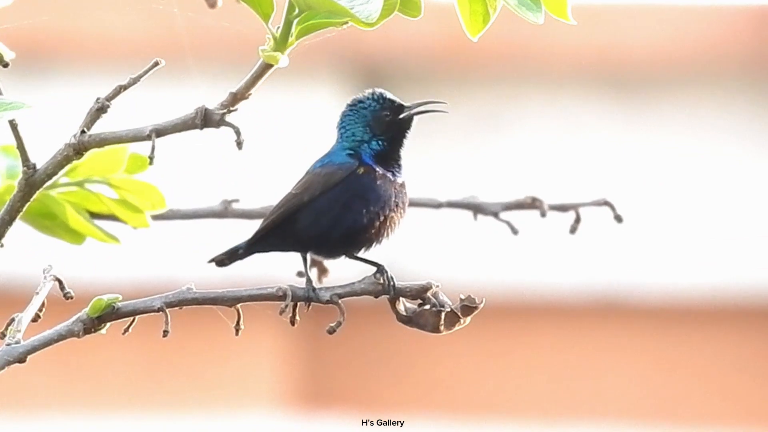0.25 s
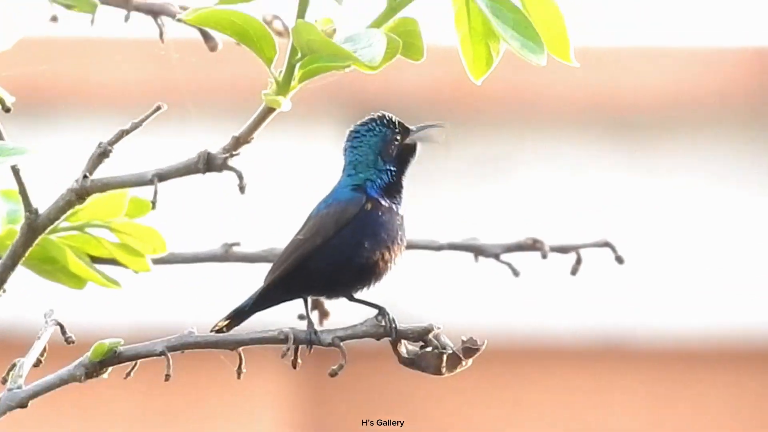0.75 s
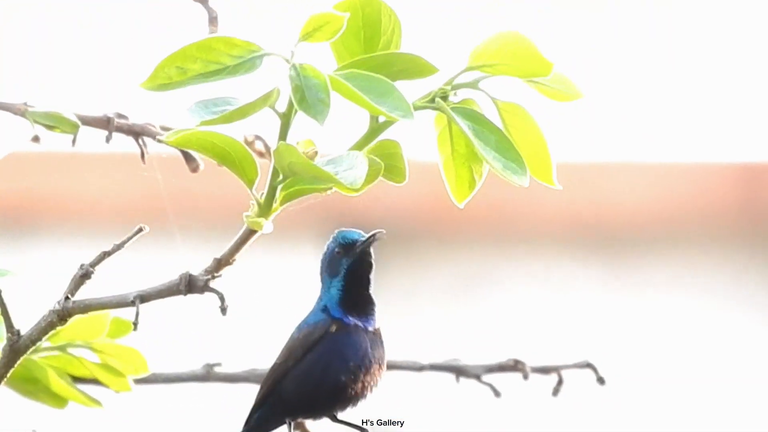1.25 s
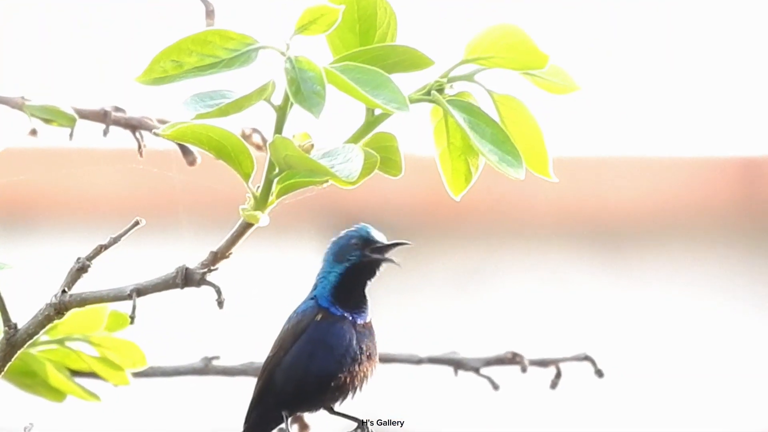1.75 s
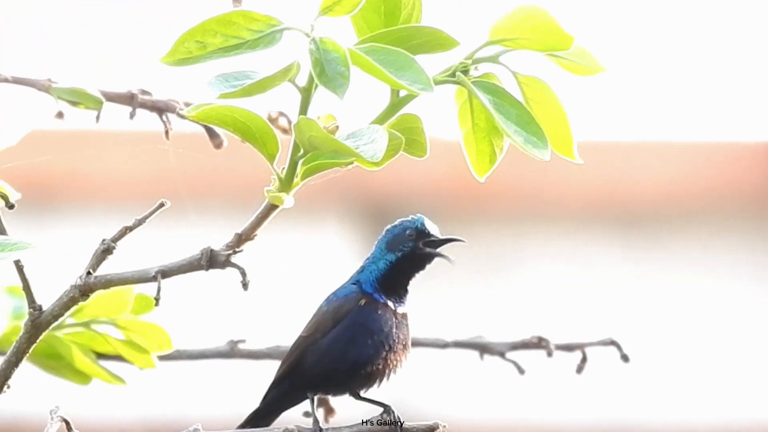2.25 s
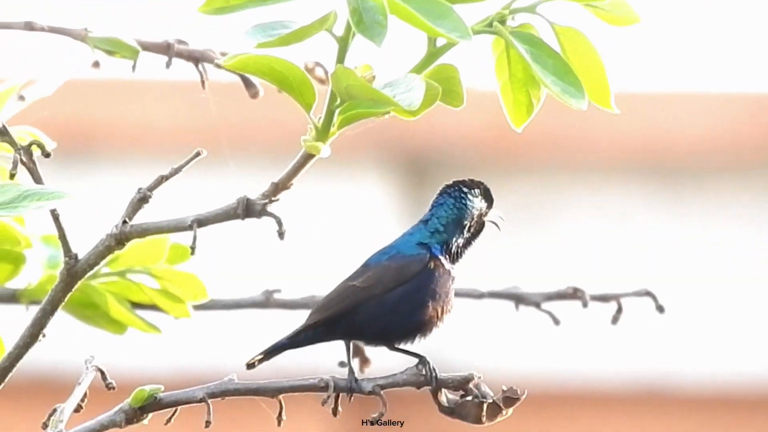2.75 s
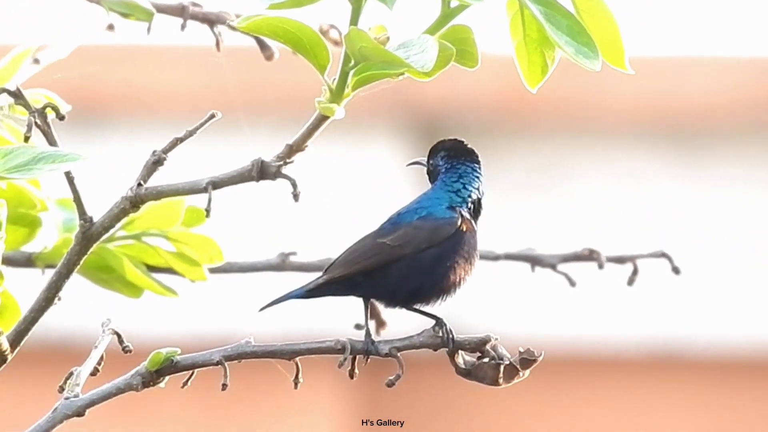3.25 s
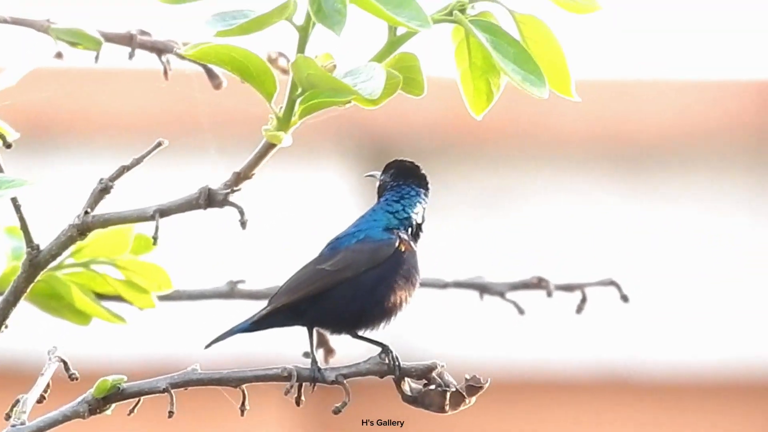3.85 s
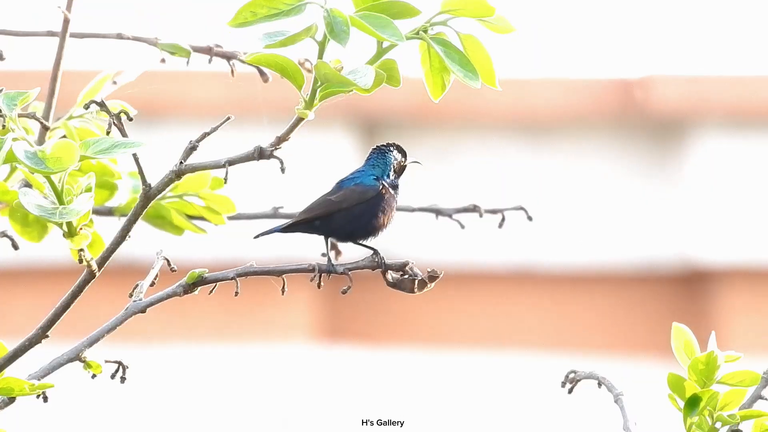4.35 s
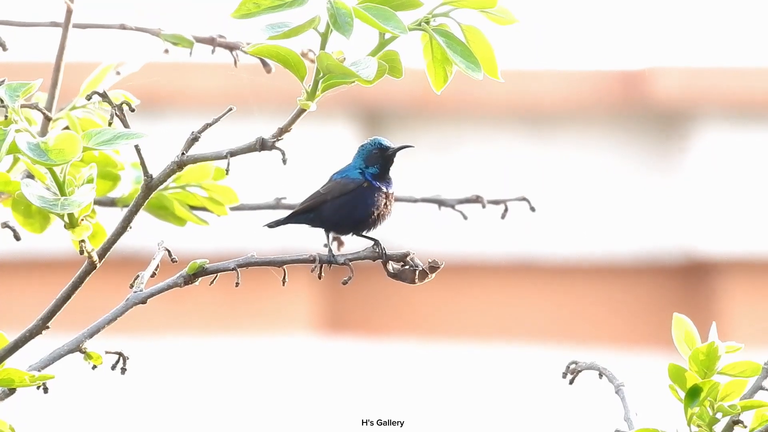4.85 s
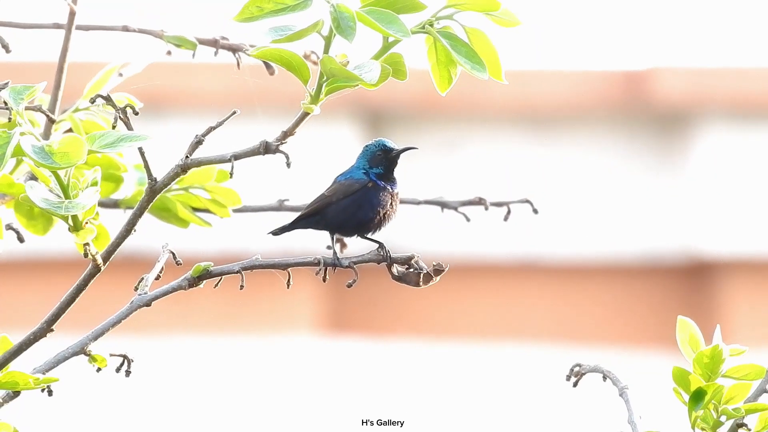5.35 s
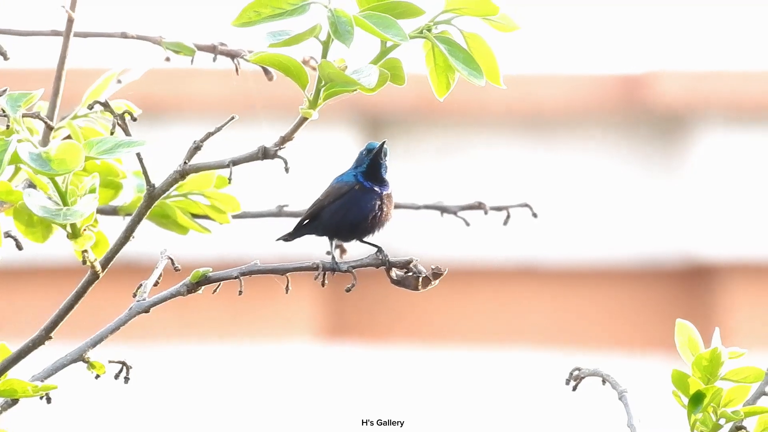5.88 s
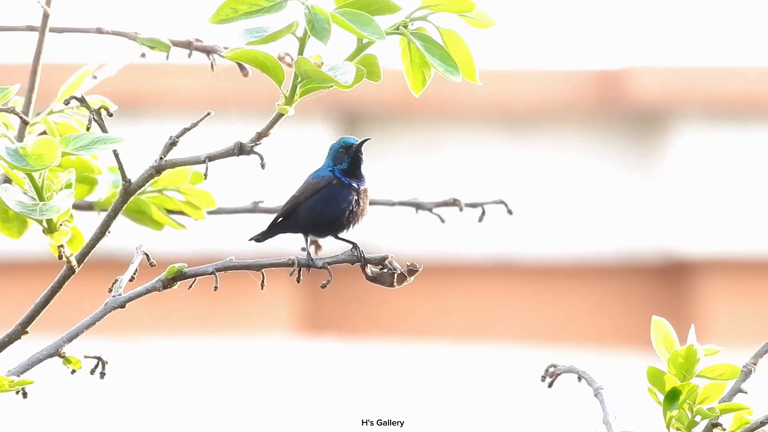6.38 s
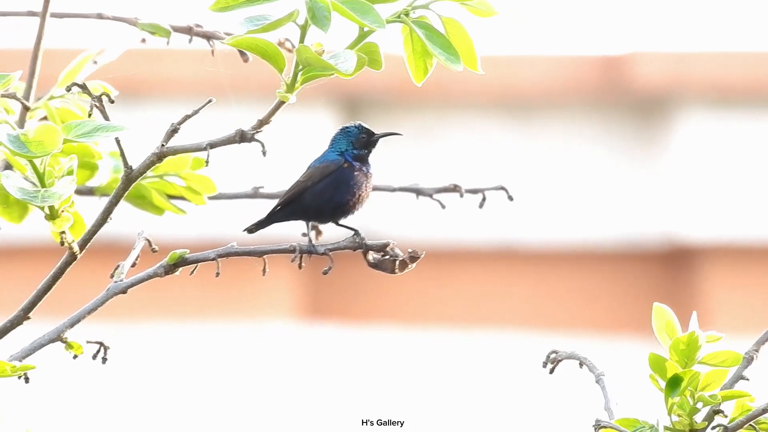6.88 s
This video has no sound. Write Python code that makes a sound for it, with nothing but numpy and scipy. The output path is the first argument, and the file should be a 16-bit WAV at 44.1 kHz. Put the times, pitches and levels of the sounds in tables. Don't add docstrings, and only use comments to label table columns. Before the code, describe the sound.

Bright, fast sunbird song outdoors, sharp upward whistles and thin chips, a quieter middle with a far trill, then singing again over soft town hush.

```python
import sys
import numpy as np
from scipy import signal
from scipy.fft import rfft, irfft, next_fast_len
from scipy.io import wavfile
from scipy.ndimage import uniform_filter1d, minimum_filter1d, map_coordinates

SR = 44100
rng = np.random.default_rng(int(sys.argv[2]) if len(sys.argv) > 2 else 0)


def gain_from_decibels(decibels):
    exponent = np.asarray(decibels, float) / 20
    return 10 ** exponent


def log_audio(samples):
    frames = np.atleast_2d(samples).T
    limited = np.clip(frames, -1, 1)
    pcm = np.round(limited * 32767).astype(np.int16)
    wavfile.write(sys.argv[1], SR, pcm)


N = 313992


def unit(x):
    return x / np.sqrt(np.mean(x ** 2) + 1e-20)


def along(points, hz):
    f, v = np.transpose(points)
    return np.interp(np.log(hz + 1), np.log(f + 1), v)


def filtered(x, response):
    m = next_fast_len(N + 8192)
    return irfft(rfft(x, m) * response(np.fft.rfftfreq(m, 1 / SR)), m)[..., :N]


def smoothed_power(x):
    return np.abs(uniform_filter1d(np.mean(x ** 2, axis=0), size=1024))


def wobble(n, rate_hz):
    knots = rng.standard_normal(int(n * rate_hz / SR) + 4)
    return map_coordinates(knots, [np.arange(n) * rate_hz / SR])


def rush(spectrum, patchy_db):
    # (f/Hz, correlation)
    alike_points = [(60, .93), (1000, .93), (2500, .85), (5000, .7), (9000, .3)]
    z = signal.stft(rng.standard_normal((2, N + 512)), nperseg=512)[2]
    field = uniform_filter1d(rng.standard_normal(z.shape[1:]), size=3, axis=0)
    field = uniform_filter1d(field, size=14, axis=1)
    pair = signal.istft(z * gain_from_decibels(patchy_db * unit(field)), nperseg=512)[1][:, :N]

    def mid_side(hz):
        angle = np.arccos(np.clip(along(alike_points, hz), -1, 1)) / 2
        return gain_from_decibels(along(spectrum, hz)) * [np.cos(angle), np.sin(angle)]

    mid, side = filtered(pair, mid_side)
    return unit(np.array([mid + side, mid - side]))


def town():
    # (f/Hz, density/dB per Hz)
    rumble_points = [(15, -67), (25, -36.5), (45, -6.5), (65, 1.5), (146, 3), (237, -9.5), (302, -10),
                     (450, -23.5), (580, -39.5), (990, -120)]
    # (f/Hz, density/dB per Hz)
    hiss_points = [(200, -42), (330, -14.5), (540, -14), (670, -9.5), (870, -13.5), (1860, -14.5),
                   (2900, -11.5), (3700, -10), (6700, -10), (8400, -29), (10000, -35), (12500, -39),
                   (15300, -49.5), (15900, -71)]
    rumble = gain_from_decibels(-2.5) * rush(rumble_points, patchy_db=-0.45)
    hiss = gain_from_decibels(2.5) * rush(hiss_points, patchy_db=3.0)
    return gain_from_decibels(-43) * (rumble + hiss)


def whistle(rows, flutter_hz, flutter_db, breath_db, edge_s):
    s, hz, db = np.transpose(rows)
    t = np.arange(s[0], s[-1], 1 / SR)
    pitch_hz = uniform_filter1d(np.interp(t, s, hz), size=130) + flutter_hz * wobble(len(t), 395.5)
    phase = 2 * np.pi * np.cumsum(pitch_hz) / SR
    ends = np.clip(np.minimum(t - s[0], s[-1] - t) / edge_s, 0, 1)
    level = gain_from_decibels(np.interp(t, s, db) + flutter_db * wobble(len(t), 152.6))
    level = level * np.sin(ends * np.pi / 2) ** 2
    breath = gain_from_decibels(breath_db) * wobble(len(t), 2400)
    return level * (1 + breath) * np.sin(phase)


def garden(direct_db, echo_db, tail_db, rise_s, t60_s, alike):
    # (delay/s, level/dB)
    echoes = [(.008, -12), (.017, -13), (.030, -7), (.047, -14), (.062, -15)]
    t = np.arange(SR // 2) / SR
    shared, own = rng.standard_normal((2, len(t)))
    alike = np.clip(alike, 0, 1)
    scatter = np.array([shared, alike * shared + np.sqrt(1 - alike ** 2) * own])
    build = 1 - np.exp(-(t / rise_s) ** 2)
    decay = gain_from_decibels(-60 * t / t60_s) + gain_from_decibels(-18 - 60 * t / .7)
    shape = build * decay
    answer = gain_from_decibels(tail_db) * scatter * shape / np.linalg.norm(shape)
    for delay_s, db in echoes:
        skew = rng.integers(0, 4, size=2)
        answer[[0, 1], round(delay_s * SR) + skew] += gain_from_decibels(db + echo_db)
    answer[:, 0] += gain_from_decibels(direct_db)
    return answer


def heard(dry, **space):
    return signal.fftconvolve(dry[None], garden(**space), axes=1)[:, :N]


def add(out, s, tone):
    start = round(s * SR)
    out[start:start + len(tone)] += tone


def glides(table, flutter_hz, breath_db, edge_s, **space):
    dry = np.zeros(N)
    for s, length_s, from_hz, to_hz, db in table:
        rows = [(s, from_hz, db), (s + length_s, to_hz, db)]
        add(dry, s, whistle(rows, flutter_hz, 4.07, breath_db, edge_s))
    return heard(dry, **space)


def distant_birds():
    # (t/s, length/s, from f/Hz, to f/Hz, level/dB)
    calls = [(.0, 0.08, 2045, 2070, -53), (.105, 0.053, 1990, 2553, -46.5), (.185, 0.025, 2460, 2080, -62),
             (1.61, 0.12, 3500, 3350, -44.5), (1.82, 0.053, 2810, 2915, -39.5),
             (1.87, 0.047, 3570, 3340, -39), (2.06, 0.066, 3534, 3866, -38.5),
             (2.19, 0.095, 4000, 3546, -42), (2.58, 0.066, 2683, 2430, -44.5),
             (2.78, 0.086, 2084, 2440, -46.5), (3.47, 0.085, 644, 722, -49),
             (3.63, 0.025, 1156, 1080, -41.5), (3.04, 0.03, 4920, 4800, -32.5), (3.87, 0.17, 641, 800, -53),
             (3.92, 0.034, 1140, 1030, -45), (5.6, .05, 1974, 2174, -41.5), (5.93, 0.097, 2076, 2143, -48)]
    return glides(calls, flutter_hz=86, breath_db=-1.5, edge_s=0.016,
                  direct_db=1.0, echo_db=-5.8, tail_db=2.5, rise_s=0.0048, t60_s=0.79, alike=1.0)


def answerer():
    # (t/s, length/s, from f/Hz, to f/Hz, level/dB)
    chips = [(.225, 0.031, 5630, 5060, -35.5), (.372, .03, 7190, 4460, -39.5),
             (.605, 0.011, 6400, 7130, -17.5), (.63, 0.042, 8200, 5680, -45),
             (.868, 0.035, 7430, 4180, -23), (.885, 0.04, 6600, 5950, -26.5),
             (1.09, 0.036, 7750, 4930, -28), (1.335, 0.026, 8500, 5600, -28.5),
             (1.44, 0.041, 6390, 5590, -22), (1.475, 0.02, 7800, 6000, -28), (1.62, 0.029, 8020, 5400, -26),
             (1.775, 0.025, 7440, 6040, -25.5), (1.915, 0.018, 7600, 5000, -16.5),
             (2.15, 0.028, 8100, 7000, -60), (2.515, 0.037, 7200, 6430, -60),
             (4.44, 0.036, 6920, 4360, -22), (4.455, 0.028, 6690, 5880, -25), (4.8, 0.039, 6880, 4620, -26),
             (4.84, 0.022, 6700, 5800, -24.5), (5.12, 0.037, 6790, 4510, -23),
             (5.215, 0.008, 7330, 6800, -19.5), (5.405, 0.032, 6830, 4270, -25.5),
             (5.6, 0.04, 6580, 5520, -32.5)]
    return glides(chips, flutter_hz=380, breath_db=-9, edge_s=.01,
                  direct_db=-4, echo_db=4, tail_db=8, rise_s=.022, t60_s=.24, alike=.7)


def flicks_and_rises():
    # (t/s, length/s, from f/Hz, to f/Hz, level/dB)
    flicks = [(1.16, 0.03, 4800, 6060, -28.5), (1.688, 0.038, 5200, 6450, -19.5),
              (1.94, .012, 4920, 6270, -24), (4.837, 0.011, 5220, 6030, -48),
              (5.161, 0.011, 5000, 5930, -40), (5.419, 0.022, 5000, 6300, -37),
              (5.685, 0.015, 5600, 6350, -15), (6.199, 0.012, 5500, 7270, -11.5),
              (6.451, 0.021, 4900, 6400, -17.5), (5.875, .02, 4100, 4670, -28),
              (5.712, .022, 3950, 4880, -17.5), (0.383, 0.032, 4210, 5500, -33),
              (1.103, .035, 4920, 6040, -20.5), (1.373, 0.011, 4890, 6080, -11.5),
              (1.378, .03, 6140, 5940, -22.5), (5.928, 0.017, 5760, 6960, -16)]
    # (t/s, length/s, from f/Hz, to f/Hz, level/dB)
    rises = [(1.202, .062, 3620, 4477, -20.5), (2.366, 0.038, 3800, 4130, -28),
             (2.472, 0.081, 3870, 4490, -28.5), (2.542, 0.07, 3415, 4564, -25.5),
             (2.696, 0.088, 3390, 4460, -26), (2.894, 0.027, 3670, 4260, -29.5),
             (2.908, 0.064, 3100, 4270, -28.5), (4.85, 0.059, 3460, 4270, -32.5),
             (5.173, .035, 3670, 4210, -36.5)]
    return [[(s, from_hz, db), (s + length_s, to_hz, db)]
            for s, length_s, from_hz, to_hz, db in flicks + rises]


def slur(knee_s, lead_s, db, from_hz, from_db, bow, bow_db, knee_hz, jump_s, top_hz, top_db, hold_s, fade_db):
    top_s = knee_s + jump_s
    return [(knee_s - lead_s, from_hz, db + from_db),
            (knee_s - lead_s / 2, from_hz + bow * (knee_hz - from_hz), db + bow_db),
            (knee_s, knee_hz, db),
            (knee_s + jump_s / 2, (knee_hz + top_hz) / 2, db - 5.5),
            (top_s, top_hz, db + top_db),
            (top_s + hold_s, top_hz, db + top_db + fade_db)]


def climbs_and_scoops():
    # (knee t/s, lead/s, knee f/Hz, top f/Hz, level/dB)
    climbs = [(.515, 0.11, 5480, 5730, -19.5), (.745, 0.1, 4960, 5830, -18),
              (1.005, .085, 4940, 5340, -16.5), (1.2, 0.084, 4950, 5480, -15)]
    scoops = [(6.012, 0.051, 4510, 6160, -12), (6.292, .075, 4426, 6870, -10),
              (6.556, .085, 4480, 6610, -10), (6.822, .087, 4510, 6780, -8.5)]
    climb = dict(from_hz=3150, from_db=-21.5, bow=.66, bow_db=-7.5, jump_s=0.029, top_db=-1, hold_s=0.016, fade_db=-18)
    scoop = dict(from_hz=3260, from_db=-13.5, bow=.3, bow_db=-19.5, jump_s=0.025, top_db=-3, hold_s=0.041, fade_db=-17.5)
    notes = []
    for table, kind in [(climbs, climb), (scoops, scoop)]:
        for s, lead_s, knee_hz, top_hz, db in table:
            notes.append(slur(s, lead_s, db, knee_hz=knee_hz, top_hz=top_hz, **kind))
    return notes


def steps():
    # (knee t/s, lead/s, jump/s, top f/Hz, level/dB)
    high_steps = [(1.555, .055, .035, 6350, -10.5), (1.775, 0.045, .045, 6500, -11.5),
                  (2.14, 0.021, 0.018, 6850, -10), (5.51, .045, .035, 6730, -10),
                  (5.765, .03, 0.022, 6250, -12.5)]
    wide_steps = [(4.962, .06, 0.03, 5785, -10.5), (5.25, .047, 0.016, 6266, -10.5)]
    low_steps = [(1.29, 0.034, 0.012, 5340, -7), (1.995, .06, .02, 7060, -11),
                 (7.012, .037, .015, 6760, -9.5)]
    swoops = [(2.28, 0.013, 0.0085, 6180, -8), (2.43, 0.032, .025, 6450, -10.5)]
    high_step = dict(from_hz=4700, from_db=-5.5, bow=0.76, bow_db=-4, knee_hz=4940, top_db=-1.5, hold_s=.05, fade_db=-15)
    wide_step = dict(from_hz=4300, from_db=-1.5, bow=0.6, bow_db=-2.5, knee_hz=4950, top_db=-2, hold_s=.04, fade_db=-16)
    low_step = dict(from_hz=4380, from_db=-4, bow=.55, bow_db=-3, knee_hz=4740, top_db=-4.5, hold_s=.04, fade_db=-13)
    swoop = dict(from_hz=4100, from_db=-2, bow=.55, bow_db=0, knee_hz=4900, top_db=-1, hold_s=0.037, fade_db=-12.5)
    kinds = [(high_steps, high_step), (wide_steps, wide_step), (low_steps, low_step), (swoops, swoop)]
    notes = []
    for table, kind in kinds:
        for s, lead_s, jump_s, top_hz, db in table:
            notes.append(slur(s, lead_s, db, jump_s=jump_s, top_hz=top_hz, **kind))
    return notes


def falls():
    # (t/s, from f/Hz, level/dB)
    plain = [(2.075, 6940, -17), (2.21, 6540, -21.5), (2.336, 5970, -18), (2.53, 6420, -18),
             (2.722, 5940, -18), (2.93, 5980, -19)]
    tinkles = [(2.41, 8550, -30.5), (2.62, 8200, -28), (2.815, 8580, -31.5)]
    length_s = .028
    notes = []
    for table, drop_hz in [(plain, 740), (tinkles, 280)]:
        notes += [[(s, hz, db), (s + length_s, hz - drop_hz, db)] for s, hz, db in table]
    return notes


def placed(shape, s, db):
    return [(s + late_s, hz, db + more_db) for late_s, hz, more_db in shape]


def arches():
    # (t/s, f/Hz, fall/s, level/dB)
    crests = [(2.617, 6910, .043, -7.5), (2.792, 7190, .053, -10), (2.99, 7040, 0.046, -8.5)]
    # (foot t/s from crest, others as share of the fall; f/Hz, level/dB)
    arch = [(-.009, 5790, 1.5), (.4, 6366, -5.5), (1, 4650, -16.5)]
    foot, *down = arch
    notes = []
    for s, hz, fall_s, db in crests:
        shape = [foot, (0, hz, 0)] + [(share * fall_s, *rest) for share, *rest in down]
        notes.append(placed(shape, s, db))
    return notes


def refrains():
    # (crest t/s, perch/s, dip level/dB, hook level/dB, held level/dB)
    crests = [(5.693, .004, -17.5, -8, -16), (5.939, 0.0046, -19.5, -14, -18),
              (6.201, 0.0065, -19.5, -16, -19), (6.454, 0.034, -22.5, -11.5, -14.5),
              (6.718, 0.028, -24, -14, -13.5), (6.98, .018, -21, -13, -19.5)]
    # (t/s from crest, f/Hz, level/dB)
    dip = [(-.045, 4586, 7), (-.026, 3697, -6), (-.008, 3823, -13.5)]
    hook = [(-.014, 7050, -15.5), (0, 7400, -12), (.008, 6790, -2), (.016, 5230, -1)]
    held = [(.043, 5530, 4.5), (.068, 5364, 0.5)]
    late_s, perch_hz, _ = dip[0]
    notes = []
    for s, perch_s, dip_db, hook_db, held_db in crests:
        perched_dip = [(late_s - perch_s, perch_hz, -7.5)] + dip
        notes += [placed(perched_dip, s, dip_db), placed(hook, s, hook_db), placed(held, s, held_db)]
    return notes


def singer():
    dry = np.zeros(N)
    notes = flicks_and_rises() + climbs_and_scoops() + steps() + falls() + arches() + refrains()
    for rows in notes:
        tone = whistle(rows, flutter_hz=75, flutter_db=4.4, breath_db=-21, edge_s=.006)
        add(dry, rows[0][0], tone)
    return heard(dry, direct_db=-3.5, echo_db=-5.5, tail_db=-0.5, rise_s=0.0033, t60_s=0.32, alike=0.78)


def chatter():
    # (t/s, level/dB)
    envelope = [(.85, -88), (1.0, -39), (1.6, -36), (2.3, -29), (2.95, -30), (3.1, -62.5), (5.45, -66.5),
                (5.9, -29.5), (6.8, -32), (7.12, -42)]
    s, db = np.transpose(envelope)
    notes = []
    for k, (late, length, pitch, bend) in enumerate(rng.random((352, 4))):
        start_s = (k + late) / 50
        length_s = 0.01164 + 0.0194 * length
        from_hz = 4700 + 2100 * pitch
        to_hz = from_hz + 1800 * (bend - .5)
        notes.append((start_s, length_s, from_hz, to_hz, np.interp(start_s, s, db, left=-90)))
    return glides(notes, flutter_hz=136, breath_db=-16.5, edge_s=0.0037,
                  direct_db=-2.0, echo_db=8.5, tail_db=5.5, rise_s=0.007, t60_s=0.25, alike=0.43)


def triller():
    # (t/s, peak level/dB)
    trill = [(3.2934, -32), (3.366, -29.5), (3.4426, -34), (3.5109, -33.5), (3.5807, -36), (3.6611, -40),
             (3.7375, -33), (3.8132, -34), (3.893, -34.5), (3.9615, -32), (4.0302, -34.5), (4.1024, -33.5),
             (4.1844, -29), (4.3044, -32)]
    notes = [(s - .002, .02, 6500, 6020, db + 0.5) for s, db in trill]
    return glides(notes, flutter_hz=60, breath_db=-20, edge_s=.006,
                  direct_db=0, echo_db=-4, tail_db=-7, rise_s=.006, t60_s=.2, alike=.75)


def housing(hz):
    damping = 1j * hz * 160
    resonance = 1 + gain_from_decibels(2.5) * damping / (6200 ** 2 - hz * hz + damping)
    return resonance / (1 + (hz / 8000) ** 24 / 4)


def scene():
    birds = distant_birds() + answerer() + singer() + chatter() + triller()
    return filtered(birds, housing) * gain_from_decibels([[-.7], [.7]]) + town()


def port_delay(x):
    # (f/Hz, phase/rad)
    lead_points = [(1500, 0), (3000, -.5), (5000, -1.0), (6200, -1.8), (7000, -1.9), (8200, -1.2)]
    sides = np.array([[1], [-1]])
    return filtered(x, lambda hz: np.exp(.5j * along(lead_points, hz) * sides))


def starve_air(x, power):
    starved = 1 / (1 + (gain_from_decibels(-27) ** 2 / (power + 1e-12)) ** 4)
    x = x - starved * filtered(x, lambda hz: (hz > 8700) * (hz < 11800))
    low_air = filtered(x, lambda hz: (hz > 7650) * (hz <= 8700))
    weak = 1 / (1 + (smoothed_power(low_air) / gain_from_decibels(-53) ** 2) ** 4)
    return x - starved * weak * low_air


def overload(x, power):
    noise = rng.standard_normal((2, N))
    fizz = filtered(noise, lambda hz: np.clip((hz - 7500) / 4500, 0, 1) * (hz < 15300))
    x = x + gain_from_decibels(-55) * np.minimum(power / gain_from_decibels(-12) ** 2, 1) ** 4 * fizz
    return x + gain_from_decibels(-40.5) * x ** 2


def limiter(x):
    peak = -minimum_filter1d(-np.abs(x).max(axis=0), size=441)
    return x * uniform_filter1d(np.minimum(1, .97 / peak), size=221)


def brief_mute(x):
    # (start t/s, end t/s)
    hole = (4.2255, 4.2402)
    t = np.arange(N) / SR
    outside_s = np.maximum(hole[0] - t, t - hole[1])
    return x * np.clip(outside_s / .001, .025, 1)


def low_pass(x):
    return signal.sosfilt(signal.butter(12, 15830, fs=SR, output="sos"), x)


def record(dry):
    x = port_delay(dry)
    power = smoothed_power(x)
    x = starve_air(x, power)
    x = overload(x, power)
    x = brief_mute(limiter(x))
    return low_pass(np.clip(x, -1, 1))


dry = scene()
out = record(dry)
log_audio(out)
```